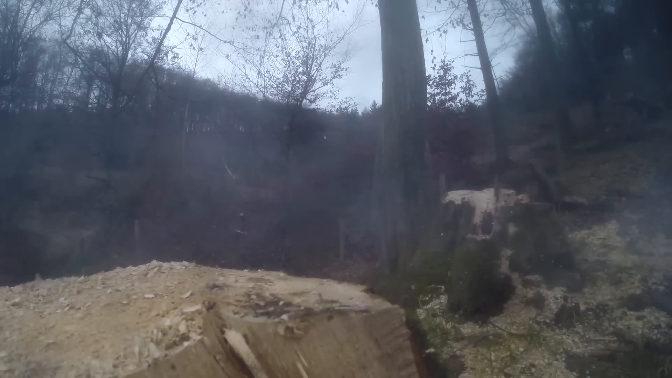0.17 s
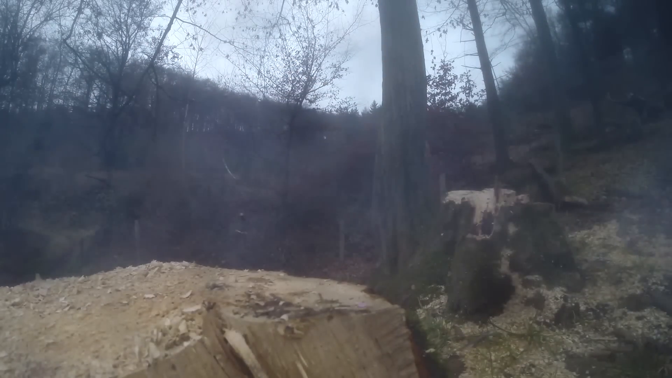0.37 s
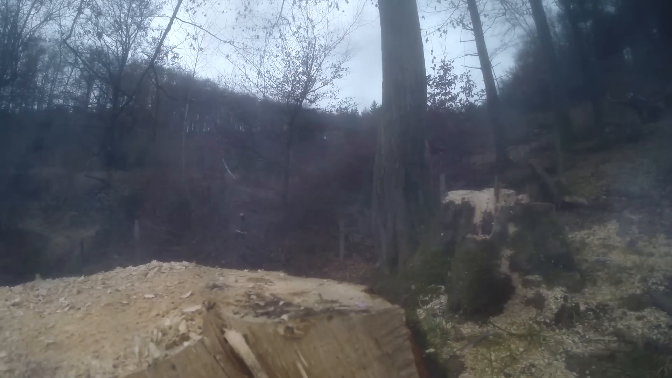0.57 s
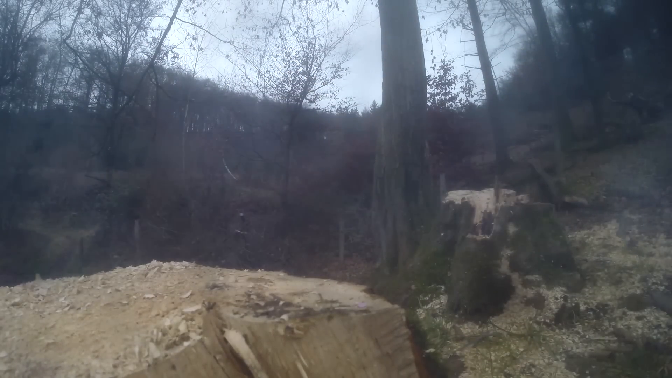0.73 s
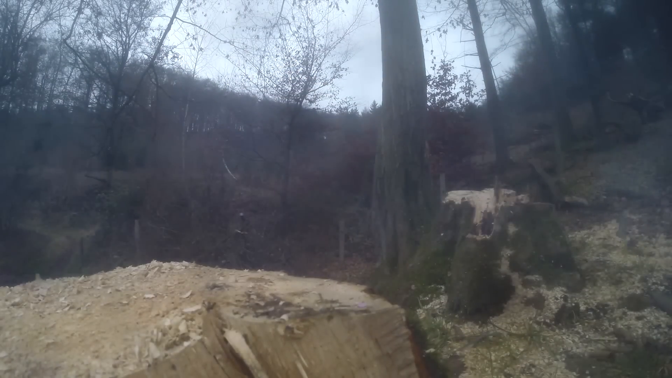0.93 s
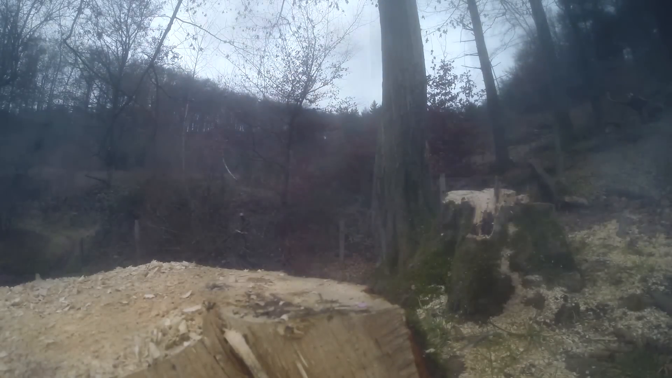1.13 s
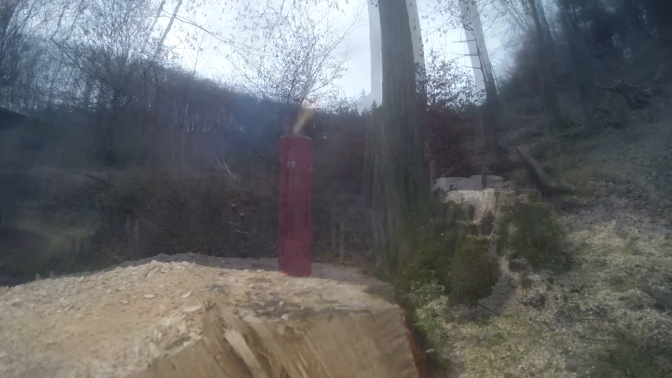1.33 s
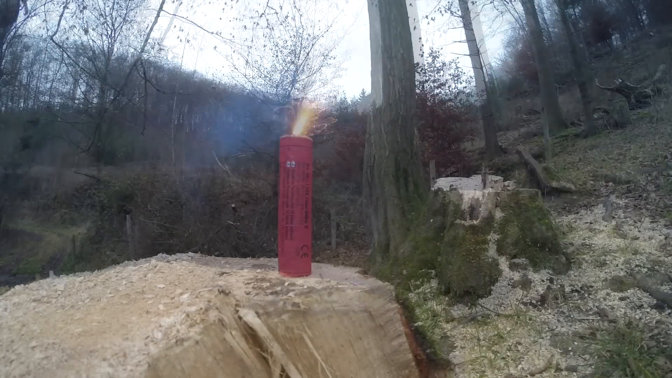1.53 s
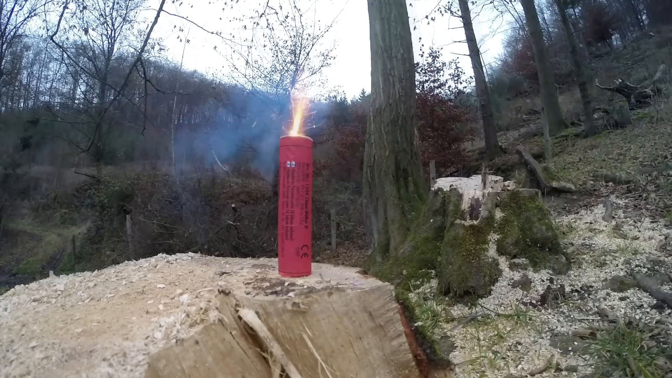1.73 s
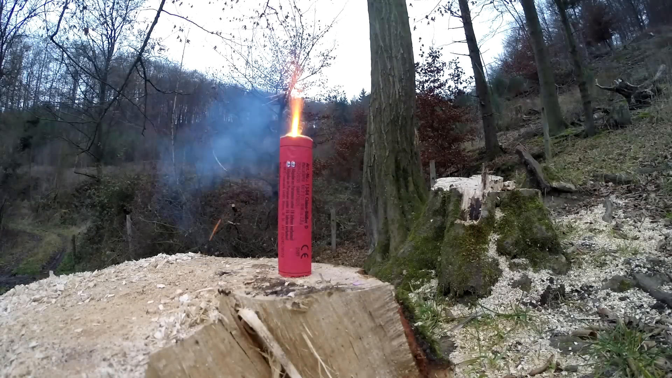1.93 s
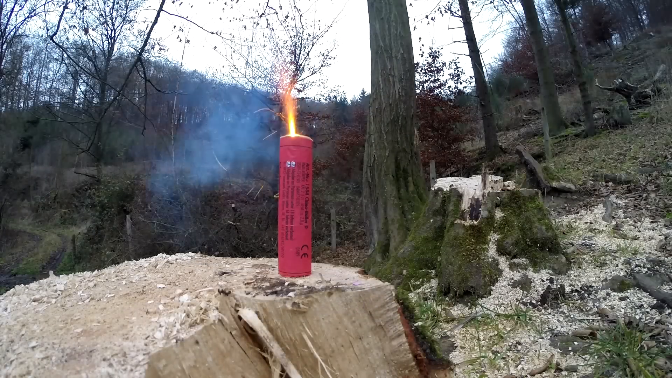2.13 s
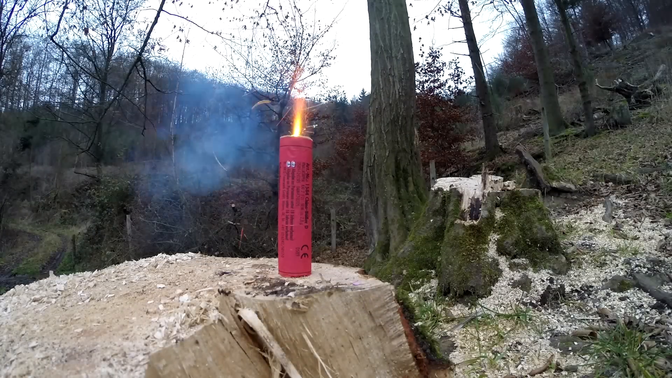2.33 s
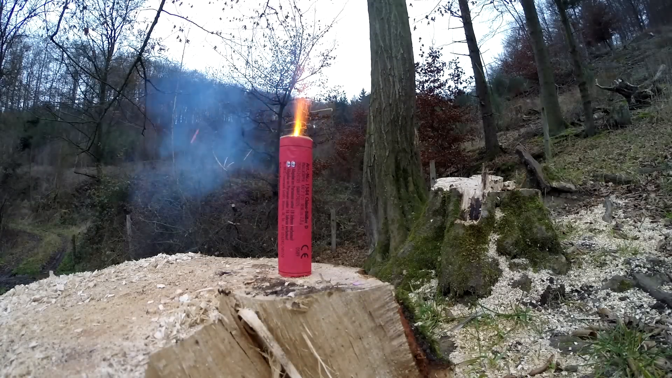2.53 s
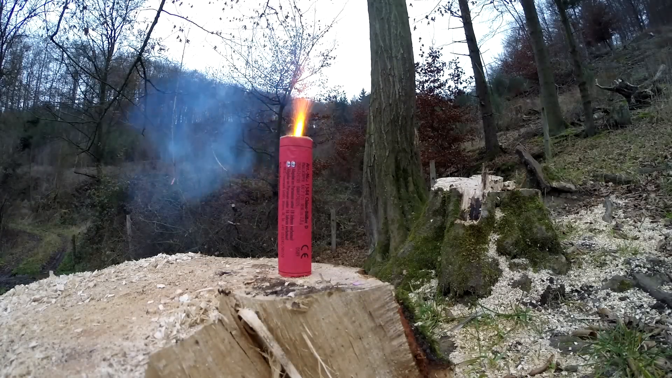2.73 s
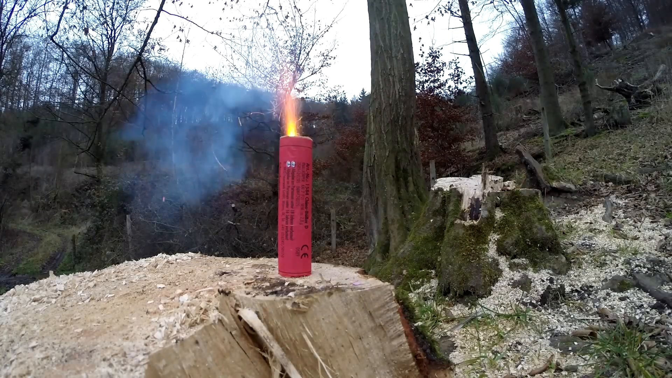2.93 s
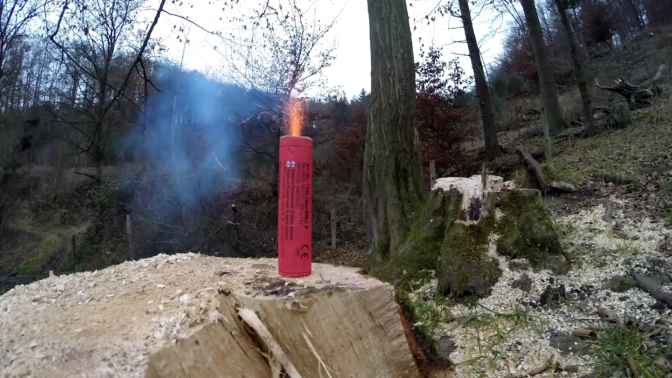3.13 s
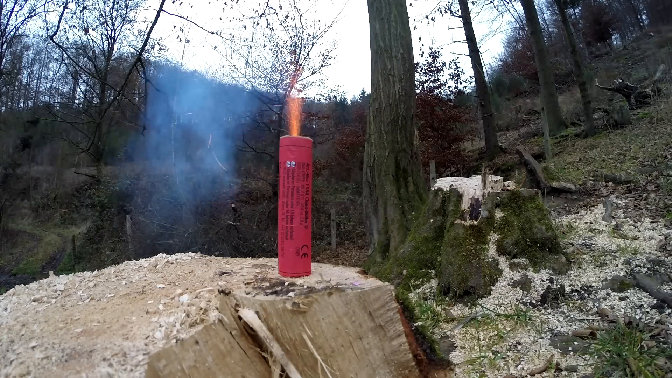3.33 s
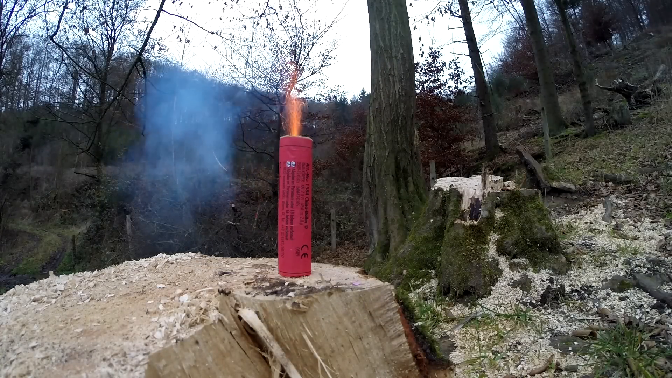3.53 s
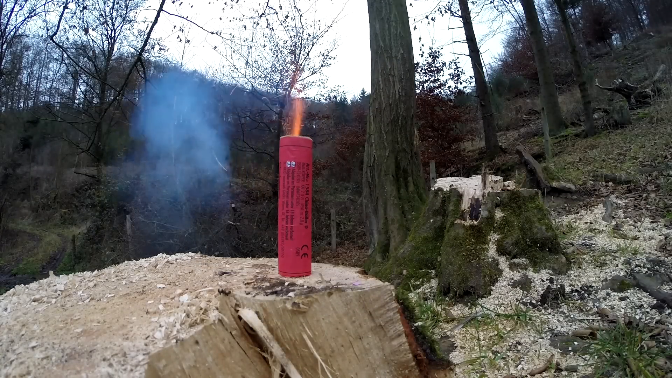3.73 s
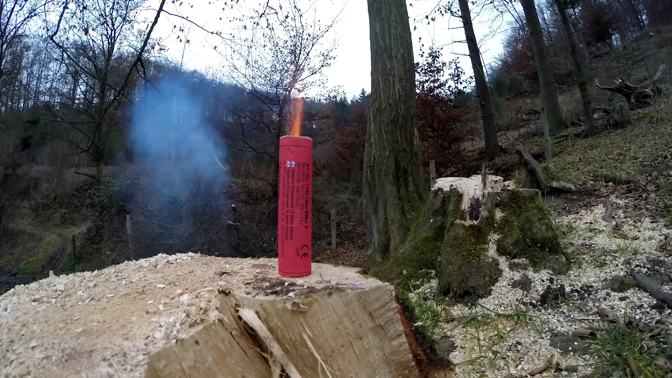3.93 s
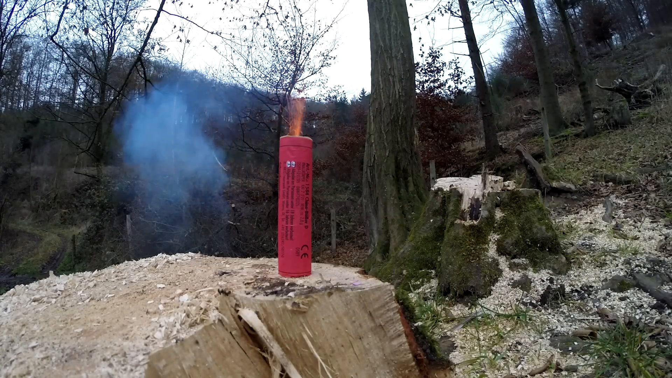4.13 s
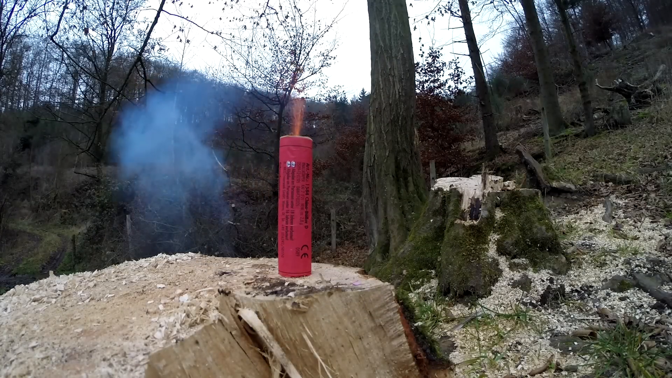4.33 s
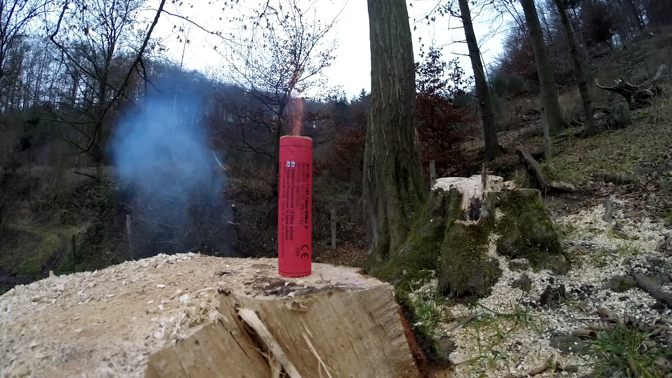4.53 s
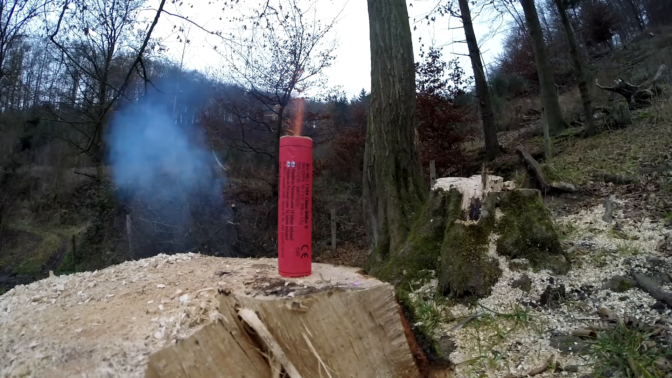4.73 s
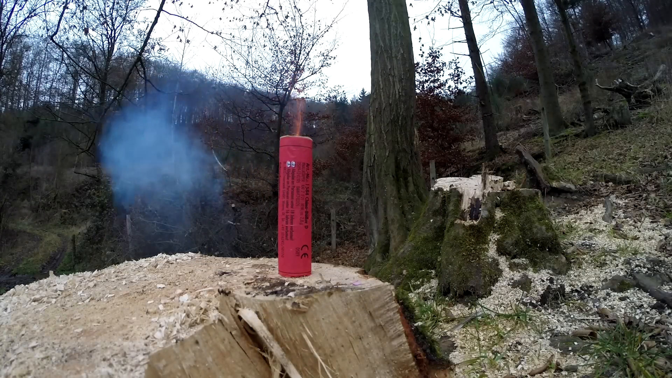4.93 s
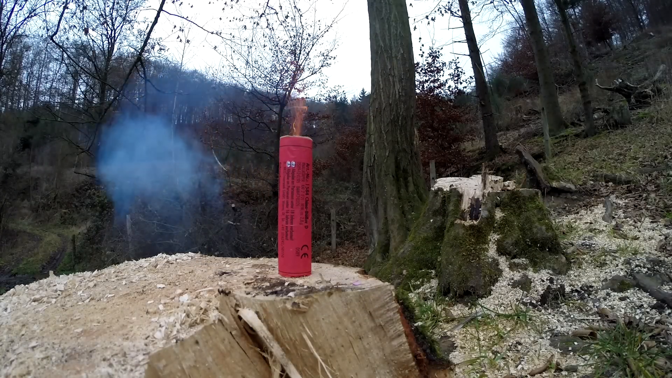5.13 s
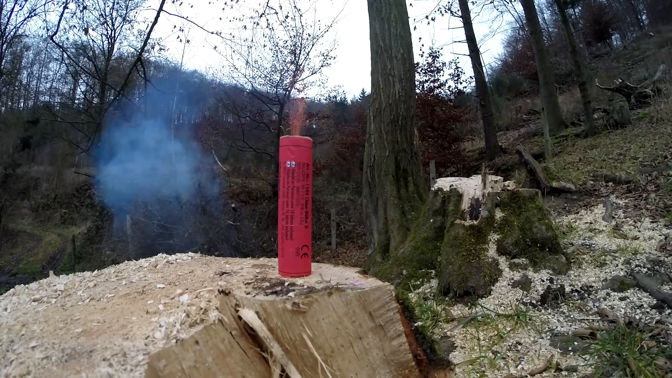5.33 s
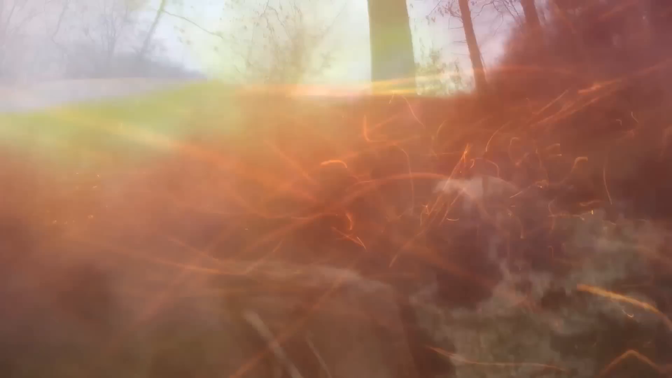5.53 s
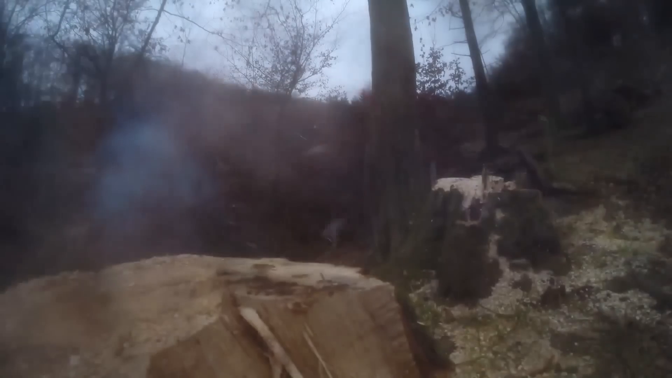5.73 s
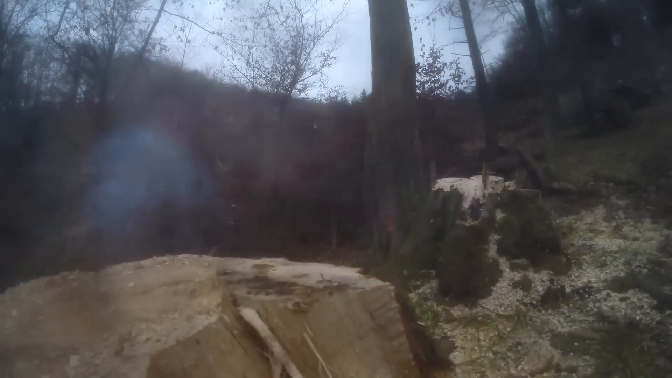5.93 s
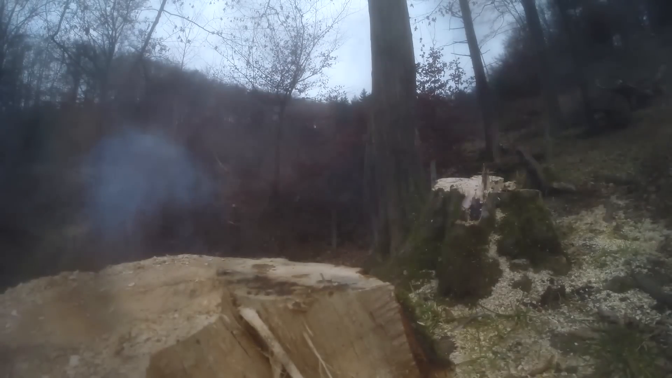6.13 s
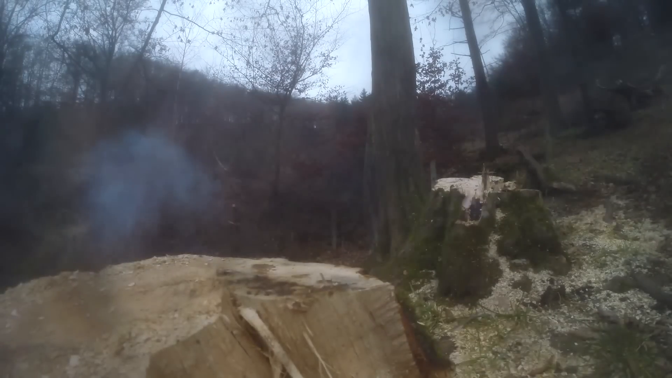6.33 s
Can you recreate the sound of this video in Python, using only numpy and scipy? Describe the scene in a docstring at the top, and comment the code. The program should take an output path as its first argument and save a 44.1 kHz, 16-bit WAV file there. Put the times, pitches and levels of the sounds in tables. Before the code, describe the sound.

A quiet wood, heard very close through a microphone in a small hard case. From 0 s, debris from an earlier blast rustles on dry leaves and fades, over soft low air noise and a barely audible thin whine. Grit ticks; a hard knock rings the case at 0.39 s, with fine dust around 0.6 and 1.2 s. At 1.24 s a fuse spits twice and catches: a sputtering, fluttering bright hiss builds until about 2.7 s, stays strong to 3.9 s, then weakens and grows duller and thinner as it burns into the tube. It surges at 5.55 s. At 5.59 s one enormous, dry bang clips flat, with a very fast falling pitch and short case ring. Deep wind-like flaps and rough echoes with a low boom follow, strongest until about 5.8 s, while leaves rustle and small scraps knock, tick and thud to 6.4 s.

```python
"""First, debris from an earlier blast patters down in a wood, over quiet air noise and rustling leaves.
A big firecracker on a tree stump, close to a microphone in a small hard case, then catches: the fuse spits,
hisses like a jet and fades as it burns into the tube. One bang overloads the microphone and rings the case;
the wooded slopes answer and scraps fall. Most sounds are coloured noise or ringing tones, shaped in time."""
import sys
import numpy as np
from scipy import signal
from scipy.fft import rfft, irfft
from scipy.io import wavfile

SR = 44100
rng = np.random.default_rng(int(sys.argv[2]) if len(sys.argv) > 2 else 0)


def generate_wav(sig):
    """Save sig (samples, or channels by samples) to the path in sys.argv[1] as 16-bit PCM at SR."""
    pcm = np.round(np.clip(np.atleast_2d(sig).T, -1, 1) * 32767).astype(np.int16)
    wavfile.write(sys.argv[1], SR, pcm)


N = 284886
T = np.arange(N) / SR   # time of every sample, in seconds
BANG_S = 5.5916

# In all tables and settings, t60_s is the time in which a sound falls by 60 dB.


def from_db(db):
    """Turn decibels into a plain multiplier."""
    return 10 ** (np.asarray(db) / 20)


def rms_one(x):
    """Scale a sound to an average (rms) strength of 1."""
    return x / np.sqrt(np.mean(x ** 2) + 1e-20)


def band(x, low_hz, high_hz):
    """Keep only the pitches between two limits, with steep sides."""
    edges = [max(low_hz, 10), min(high_hz, SR / 2 - 100)]
    return signal.sosfilt(signal.butter(3, edges, "band", fs=SR, output="sos"), x + 1e-18)


def noise(spectrum):
    """Noise of rms 1, coloured by rows of pitch_hz, level_db (per Hz, relative)."""
    hz, db = np.transpose(spectrum)
    bins = np.maximum(np.fft.rfftfreq(N, 1 / SR), 1)
    colour = from_db(np.interp(np.log(bins), np.log(hz), db))
    white = rfft(rng.standard_normal(N))
    return rms_one(irfft(white * colour, N))


def drift(rate):
    """A random wandering line with about rate turns a second and rms 1."""
    knots = rng.standard_normal(8192)
    return rms_one(np.interp(T * rate, np.arange(len(knots)), knots))


def bump(centre, half_s):
    """A smooth rise and fall of height 1, down to about 0.37 at half_s from the centre."""
    return np.exp(-np.minimum(((T - centre) / half_s) ** 2, 50))


def fade(start, t60):
    """A sudden onset, then an even fall in dB."""
    return (T >= start) * from_db(-60 * np.clip((T - start) / t60, 0, 5))


def arrival(peak_s, rise_s, t60):
    """A smooth rise to the peak, then an even fall in dB."""
    return (T < peak_s) * bump(peak_s, rise_s) + fade(peak_s, t60)


def ring(x, hz, t60):
    """A resonance: each unit click sets off a dying sine that starts at height 1."""
    shrink = from_db(-60 / (t60 * SR))   # per sample
    turn = 2 * np.pi * hz / SR
    return signal.lfilter([0, np.sin(turn)], [1, -2 * shrink * np.cos(turn), shrink * shrink], x + 1e-18)


def strike(hits, modes):
    """Clicks (start_s, level_db) ring all the tones of a body, in alternating sign."""
    clicks = np.zeros(N)
    for s, db in hits:
        clicks[int(s * SR)] += from_db(db)
    out = 0
    for k, (hz, db, t60) in enumerate(modes):
        out = out + (-1) ** k * from_db(db) * ring(clicks, hz, t60)
    return out


# colour of the low air noise: pitch_hz, level_db (per Hz, relative)
AIR_COLOUR = [(20, -4), (60, 0.5), (150, -2), (300, -6.5), (600, -10.5), (1500, -16.5), (4000, -22),
              (7500, -27.5), (10000, -28), (15000, -34)]
# colour of the rustling leaves: pitch_hz, level_db (per Hz, relative)
LEAF_COLOUR = [(200, -20.5), (550, -16.5), (850, -10), (1300, -5.5), (1480, -3.5), (1600, 6.5),
               (1800, -5.5), (2600, -2.5), (3100, -12), (3500, -12), (4200, -18.5), (6000, -21),
               (8000, -40.5), (15000, -46.5)]
# scraps rain on dry leaves after the earlier blast and this one: blast_s, level_db
LEAF_FALLS = [(-.55, -51.5), (5.59, -57.5)]


def background(waver_db=1.0, whine_db=-16.0, whine_hz=11000, calm_db=-66.0):
    """Air noise and a thin electronic whine sink after each blast and creep back; leaves rustle under scraps."""
    air_db, hush_db, hush_hold_s, recover_db_per_s = -55.5, 20.5, 0.16, 24
    fall_rise_s, fall_hold_s, fall_t60_s = 0.27, 0.8, 3.8
    hush, rustle = 0, from_db(calm_db)
    for s, db in LEAF_FALLS:
        age = T - s
        recovering = hush_db - recover_db_per_s * (age - hush_hold_s)
        hush = hush + (age > 0) * np.clip(recovering, 0, hush_db)
        dying = from_db(-60 * np.maximum(age - fall_hold_s, 0) / fall_t60_s)
        falling = np.clip(age / fall_rise_s, 0, 1) * dying
        rustle = np.hypot(rustle, from_db(db) * falling)   # add as powers
    wobble = .6 * drift(70)   # unsteady phase, radians
    whine = np.sqrt(2) * np.sin(2 * np.pi * whine_hz * T + wobble)
    floor = from_db(air_db - hush) * (noise(AIR_COLOUR) + from_db(whine_db) * whine)
    return floor + rustle * from_db(waver_db * drift(60)) * noise(LEAF_COLOUR)


# hard knocks of debris on the case: start_s, level_db (added to the tone levels below)
KNOCKS = [(.272, -26), (.3645, -25), (.3866, -10.5), (.3873, 1.5), (.3891, -9.5), (.958, -31.5),
          (5.616, -12.5), (5.767, -21)]
# tones a knock rings: pitch_hz, level_db, t60_s
KNOCK_TONES = [(249.3, -40.5, .14), (600, -34, 0.0043), (1017, -30.5, 0.02), (1440, -30, .02),
               (1615, -46.5, 0.017), (1860, -21.5, .025), (2470, -14.5, 0.0067), (2910, -20, 0.027),
               (3150, -21, .014), (4650, -33, 0.0066), (5050, -28.5, 0.014), (6230, -31.5, 0.014),
               (6700, -34, .009), (10500, -42.5, .004)]
# grit landing: start_s (just before the tick), level_db (before grit_db is added)
GRIT = [(0.0144, -26.5), (0.1875, -40.5), (0.4224, -54), (0.435, -45), (0.4624, -53), (0.5087, -50),
        (0.9348, -39), (5.82, -45), (5.911, -39), (5.9934, -55)]
# soft scraps landing on wood and soil: start_s, level_db, pitch_hz, t60_s
THUDS = [(5.790, -39, 576, 0.045), (5.817, -48, 590, 0.052), (5.9459, -38, 1630, 0.025),
         (6.427, -42, 265, .15)]


def debris(grit_db=-7.0, grit_t60=0.0094, thud_noise_db=-8.5):
    """Hard bits ring the case, grit makes short noise ticks, and soft scraps thud with a tone and a scuff."""
    out = strike(KNOCKS, KNOCK_TONES)
    gritty = noise([(800, -18), (2500, -10.0), (4000, -2), (5800, 4.5), (7500, 2.5), (10000, 3.0), (15000, -11)])
    for s, db in GRIT:
        out = out + gritty * from_db(db + grit_db) * fade(s + 0.00096, grit_t60)
    for s, db, hz, t60 in THUDS:
        scuff = rms_one(band(rng.standard_normal(N), hz * 0.77, hz * 1.23))
        out += strike([(s, db)], [(hz, 0, t60)])
        out += from_db(db + thud_noise_db) * scuff * fade(s, t60)
    return out


# showers of fine dust: centre_s, half_length_s, level_db
DUST_SHOWERS = [(.62, .14, -66), (1.2, .25, -69), (5.74, .06, -66)]


def dust(per_s=260.0, spread_db=3.5, grain_t60=.006):
    """Many tiny grains of uneven size, each a brief bright tick."""
    level = sum(from_db(db) * bump(s, half_s) for s, half_s, db in DUST_SHOWERS)
    sizes = from_db(spread_db * np.minimum(rng.exponential(1, N), 4))
    grains = (rng.random(N) < per_s / SR) * sizes
    ticks = ring(grains, SR / 4, grain_t60) * rng.standard_normal(N)
    return level * rms_one(band(ticks, 3800, 11500))


# the fuse catching: start_s, level_db
SPITS = [(1.2348, -40.5), (1.2407, -29)]


def spits(t60=0.02, hollow_db=-5.0, hollow_t60=0.032):
    """Two sharp spurts of noise as the powder catches; the low tones last longer."""
    sharp = noise([(1200, -45), (1700, -18), (4000, -14), (5700, 5), (7000, -6), (10000, -19), (15000, -35)])
    hollow = from_db(hollow_db) * rms_one(band(rng.standard_normal(N), 1740, 3330))
    return sum(from_db(db) * (sharp * fade(s, t60) + hollow * fade(s, hollow_t60)) for s, db in SPITS)


def muffled(open_db, loss_db, halfway_s, scale_s):
    """Level in dB of a part of the hiss while the flame sinks into the tube."""
    return open_db - loss_db / (1 + np.exp((halfway_s - T) / scale_s))


# resonances that colour the hiss: pitch_hz, width_hz, level_db (per resonance, relative)
FUSE_BANDS = [(1684, 126, -5), (1819.5, 120, -4), (2470, 535, -9), (3133, 330, -8.5), (3445, 290, -3),
              (3780, 650, -12), (4343, 610, -2), (4984, 580, -5.5), (5770, 510, -8), (6650, 560, -15.5),
              (7400, 500, -26.5), (8170, 560, -21.5), (9150, 790, -29.5), (10920, 1450, -24),
              (12850, 950, -29), (14300, 2000, -38.5)]
# colour of the rushing gas: pitch_hz, level_db (per Hz, relative)
GAS_COLOUR = [(60, 0), (160, 0), (350, -6), (700, -7.5), (1120, -6), (1450, -14.5), (3000, -15),
              (8000, -26.5), (15000, -37)]
# strength of the fuse's gas jet: time_s, level_db (before jet_db is added)
JET = [ [(1.28, -52.5), (2.0, -42.5), (2.74, -36), (3.88, -36), (4.48, -41), (4.74, -40), (5.52, -44.5)],
       ][0]
# the jet flares or falters, last as the flame reaches the charge:
# centre_s, half_length_s, gain_db (halved for the lowest tones), tilt_db_per_octave (middle tones)
FLARES = [(1.504, 0.076, 2.5, 4), (1.683, 0.12, -2, 4), (2.42, .3, -0.5, -3), (2.94, 0.062, -1.5, 16.5),
          (3.85, 0.77, -0.5, 4.5), (4.854, .14, 1, -1.5), (5.561, .022, 8, 0)]
# sinking into the tube muffles the low, hollow tones and the high sizzle:
# open_db (against the jet), loss_db, halfway_s, time_scale_s
HOLLOW = (8.1, 14.04, 2.42, 0.54)
SIZZLE = (7.0, 14.0, 2.28, 0.22)


def fuse(flutter_db=0.77, sputter_db=0.7, own_db=0.65, grain_db=2.0, jet_db=0.66, tilt_db=-1.5, rush_db=-20.5):
    """A sputtering gas jet of tiny pops sounds through fixed resonances; it surges just before the bang."""
    steady = np.interp(T, *np.transpose(JET)) + jet_db
    hollow = steady + muffled(*HOLLOW)
    sizzle = steady + muffled(*SIZZLE)
    flare = sum(db * bump(s, half_s) for s, half_s, db, _ in FLARES)
    tilt = tilt_db + sum(slope * bump(s, half_s) for s, half_s, _, slope in FLARES)
    burning = np.interp(T, [SPITS[0][0], JET[0][0], BANG_S, BANG_S + .002], [0, 1, 1, 0])
    # slow flutter and fast sputter shake the whole jet
    flow = burning * from_db(flutter_db * drift(28) + sputter_db * drift(190))
    out, power = 0, 0
    for hz, width, db in FUSE_BANDS:
        pop_db = grain_db * np.minimum(rng.exponential(1, N), 7)
        pops = rms_one(rng.standard_normal(N) * from_db(pop_db))
        tone = from_db(db) * band(pops, hz - width / 2, hz + width / 2)
        # pitch decides how much a tone follows the hollow part, the plain jet or the sizzle
        low = np.interp(hz, [2600, 4200], [1, 0])
        high = np.interp(hz, [6700, 9000], [0, 1])
        middle = steady + tilt * np.log2(hz / 4600)
        level = low * hollow + high * sizzle + (1 - low - high) * middle
        # each tone also wavers on its own
        out = out + tone * from_db(level + (1 - low / 2) * flare + own_db * drift(20))
        power += np.mean(tone ** 2)
    rush = from_db(hollow + rush_db) * noise(GAS_COLOUR)
    return flow * (out / np.sqrt(power) + rush)


# the case struck by the shock: pitch_hz, level_db, t60_s
CASE_TONES = [(330, -6, .015), (466, -4.5, .006), (640, -5, .012), (1020, 5.5, .013), (1297, 4.5, 0.021),
              (1670, 1, .022), (1920, 4, 0.018), (2500, -2, .018), (2758, -2, 0.0091), (3148, 2.5, 0.02),
              (3773, -5, 0.017), (5680, -4, .016), (7000, -2.5, 0.012), (1811, -28.5, .52)]
# colour of the tearing burst: pitch_hz, level_db (per Hz, relative)
BLAST_COLOUR = [(100, -13), (700, -6), (2000, 11), (5000, -5.5), (7000, -5.5), (9000, -8), (15000, -22)]


def bang(shock_db=2.5, shock_s=.0024, shock_rise_s=0.00033, shock_lag_s=.0015,
         crack_db=13.5, crack_t60=.011, crack_high_hz=7500, crack_low_hz=126, smear_s=0.0009405,
         blast_db=0.0, blast_t60=0.023, case_lag_s=0.00091,
         flare_db=-9.5, flare_rise_s=0.0016, bounce_s=0.0074, bounce_db=-13.0):
    """A brief flare, then a push and longer suction, a tearing burst, the ringing case, a ground bounce."""
    age = np.maximum(T - BANG_S, 0)
    swell = (T < BANG_S) * np.exp(np.minimum(T - BANG_S, 0) / flare_rise_s)
    flare_noise = noise([(1200, -30.0), (1900, -8.0), (3000, -22.5), (4400, 1.5), (7000, -17.0), (12000, -35)])
    flare = from_db(flare_db) * swell * flare_noise

    inside = np.maximum(age - shock_lag_s, 0)   # the pressure takes a moment to enter the case
    push_and_suction = (1 - inside / shock_s) * np.exp(-inside / shock_s)
    shock = -from_db(shock_db) * push_and_suction * (1 - np.exp(-inside / shock_rise_s))

    # bending waves in the case wall carry high tones fastest, so the front becomes a rapid fall in pitch
    falling_cycles = (crack_high_hz - crack_low_hz) * smear_s * (1 - np.exp(-age / smear_s))
    cycles = crack_low_hz * age + falling_cycles
    crack = -from_db(crack_db) * fade(BANG_S, crack_t60) * np.sin(2 * np.pi * cycles)

    bounce = from_db(bounce_db) * fade(BANG_S + bounce_s, blast_t60 / 2)
    burst = from_db(blast_db) * (fade(BANG_S, blast_t60) + bounce) * noise(BLAST_COLOUR)
    case = strike([(BANG_S + case_lag_s, 0)], CASE_TONES)
    return flare + shock + crack + burst + case


# air pushed aside by the bang
def gust(gust_db=-42.5, rise_s=.012, t60=1.8, flap_per_s=14.0, flap_db=3.0):
    """Displaced air buffets the microphone: deep noise in quick flaps that settles."""
    air = noise([(8, 6.0), (20, 2), (45, -9.0), (80, -15), (150, -34.5), (600, -62), (2000, -88.5)])
    flaps = flap_db * np.cos(2 * np.pi * flap_per_s * (T - BANG_S - rise_s))
    return from_db(gust_db + flaps) * arrival(BANG_S + rise_s, rise_s, t60) * air


# colour of the echoes: pitch_hz, level_db (per Hz, relative)
ECHO_COLOUR = [(60, -2), (200, -3), (600, -6.5), (1300, -1), (1650, 8), (2100, -0.5), (2800, -1.5),
               (4000, -6), (6000, -10.5), (7500, -18), (11000, -27), (15000, -40)]
# the wooded ground answers, from near trunks to the slope and the far valley:
# delay_s (bang to peak), level_db, rise_s, t60_s
RETURNS = [(.012, -38.5, .006, .33), (.105, -44, .025, 0.7), (.165, -44, .035, .42),
           (.29, -57.5, 0.099, 1.6), (.665, -61, .05, .8)]


def echoes(scatter_db=1.5, boom_db=-5.0, boom_low_hz=48, boom_high_hz=90,
           boom_delay_s=0.13, boom_rise_s=.2, boom_t60=0.34):
    """Trunks and slopes scatter the bang back as uneven noise, with a low boom."""
    power = sum((from_db(db) * arrival(BANG_S + delay, rise_s, t60)) ** 2 for delay, db, rise_s, t60 in RETURNS)
    scattered = from_db(scatter_db * drift(200)) * noise(ECHO_COLOUR)
    deep_noise = rms_one(band(rng.standard_normal(N), boom_low_hz, boom_high_hz))
    boom = deep_noise * arrival(BANG_S + boom_delay_s, boom_rise_s, boom_t60)
    return np.sqrt(power) * (scattered + from_db(boom_db) * boom)


def scene():
    """All the sounds added together, in one channel."""
    before = background() + debris() + dust() + spits() + fuse()
    return (before + bang() + gust() + echoes())[None]


def record(dry):
    """The overloaded microphone clips the bang flat; pitches above 15250 Hz are cut steeply."""
    clipped = np.clip(dry, -1, 1)
    return signal.sosfilt(signal.ellip(10, .1, 70, 15250, fs=SR, output="sos"), clipped)


dry = scene()
out = record(dry)
generate_wav(out)
```